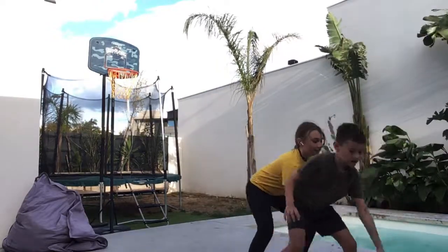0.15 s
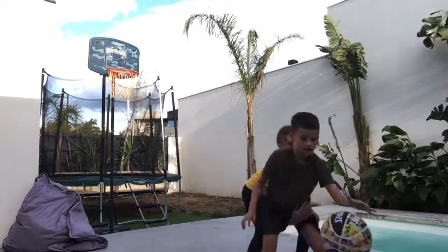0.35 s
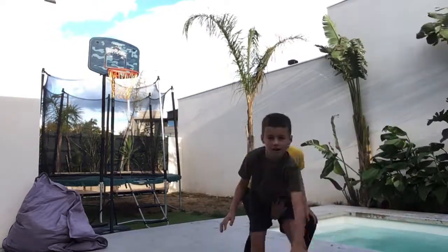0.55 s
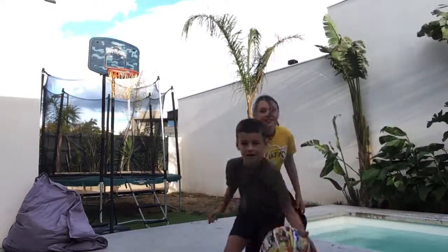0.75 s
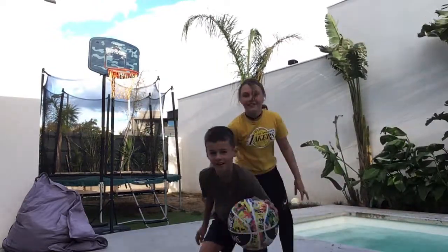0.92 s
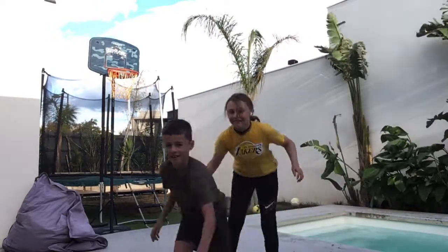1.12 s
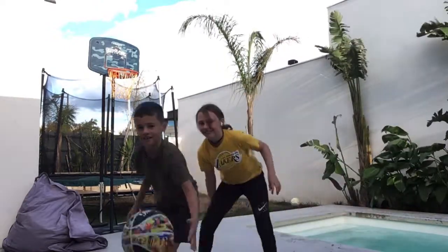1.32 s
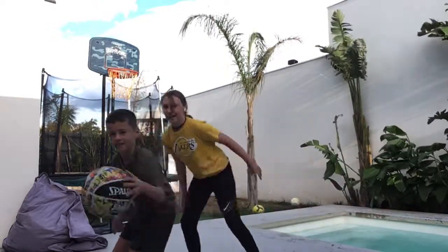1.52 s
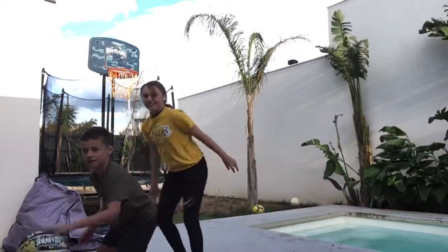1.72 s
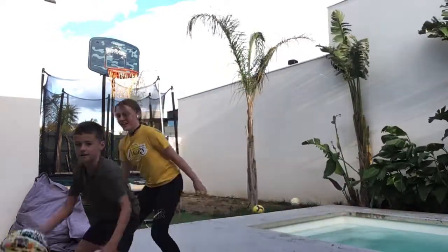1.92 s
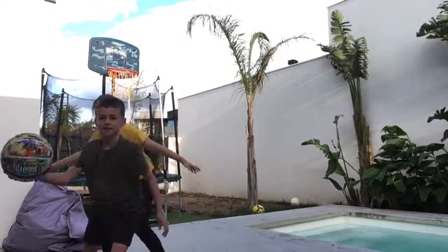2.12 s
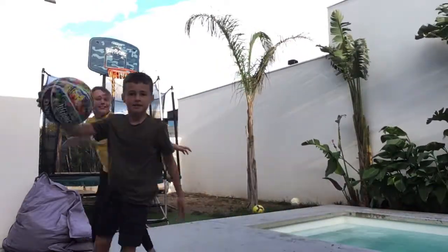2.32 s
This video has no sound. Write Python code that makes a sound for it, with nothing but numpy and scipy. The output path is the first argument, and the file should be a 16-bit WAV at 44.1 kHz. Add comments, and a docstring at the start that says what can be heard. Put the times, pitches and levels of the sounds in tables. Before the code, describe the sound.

A basketball hits concrete four times, each a sharp slap with a hollow ring and low thump, echoing off close walls; soft palm pats and faint shoe scuffs between, a few metres from the microphone.

```python
"""A basketball is dribbled on a concrete patio in a walled yard, a few metres from the microphone. The suburb
hums as filtered noise while the tail of a bounce just past dies away. Shoes tick and brush as gritty noise and
thud as damped swings. Each of four bounces is a bright noise slap with ringing ball modes and a low thump; near
walls send back separate echoes, then a diffuse noise tail. From the second bounce on, the palm pats the ball in
between, and one more footstep lands: soft damped swings with faint tails."""
import sys
import numpy as np
from scipy import signal
from scipy.io import wavfile

SR = 44100
rng = np.random.default_rng(int(sys.argv[2]) if len(sys.argv) > 2 else 0)


def how_loud(loudness_db):
    """Turn decibels into a plain amplitude multiplier (0 dB gives 1, 20 dB gives 10)."""
    steps = np.asarray(loudness_db, float) / 20
    return 10 ** steps


def transcribe(signal):
    """Save signal, clipped to [-1, 1], as a 16-bit WAV file at the path in sys.argv[1]."""
    frames = np.atleast_2d(signal).T
    limited = np.clip(frames, -1, 1)
    pcm = np.round(limited * 32767).astype(np.int16)
    wavfile.write(sys.argv[1], SR, pcm)


N = 103635

# Ball hitting the slab. Each row: start in seconds, thump level in dB (thump() adds 6),
# thump pitch in Hz, tail level in dB. The first falls before the start, so only its tail is heard.
BOUNCES = [(-.28, -20, 170, -18), (.2055, -9.5, 165, -21), (0.654, -19.5, 160, -24.5),
           (1.1999, -14.5, 161, -23.5), (1.8615, -14, 151, -21.5)]
# Soles landing dully on the slab. Each row: start in seconds, level in dB (thump() adds 6), pitch in Hz,
# tail level at that pitch in dB.
FOOTFALLS = [(0.091, -49, 110, -57), (.39, -45, 110, -54), (.52, -53, 332, -61), (0.782, -42, 79.4, -62),
             (1.53, -47, 125, -59), (1.471, -44, 63.5, -49.5), (1.82, -57, 108, -52.5),
             (1.999, -52, 59, -50)]
# Palm patting the ball, plus one footstep at 1.61 s. Each row: start in seconds, level in dB (thump() adds 6),
# pitch in Hz, # tail level at that pitch in dB.
PATS_AND_STEP = [(0.933, -60, 244, -80), (1.465, -35.5, 307, -44.5), (1.49, -47, 480, -60), (2.216, -44, 484, -57),
                 (1.61, -49, 297, -63), (2.212, -34.5, 310, -46), (2.232, -39, 315, -63), (2.253, -37.5, 330, -69)]
SOFT_CYCLES = 15.6  # pats and footfalls: cycles to die by 60 dB
THIRD_OCTAVES = 25 * 2 ** np.arange(0, 9.5, 1 / 3)  # band centres, Hz


def at_hz(points, hz):
    """Read a table on a log-frequency axis."""
    hz_points, values = np.array(points).T
    return np.interp(np.log(hz), np.log(hz_points), values)


def band_levels(spectrum):
    """Turn dB per Hz into third-octave levels whose powers sum to 0 dB."""
    level = at_hz(spectrum, THIRD_OCTAVES) + 10 * np.log10(THIRD_OCTAVES)
    return level - 10 * np.log10(np.sum(10 ** (level / 10)))


def band(x, hz, octaves):
    """Band-pass around a centre."""
    edges = np.clip([hz * 2 ** (-octaves / 2), hz * 2 ** (octaves / 2)], 12, .45 * SR)
    return signal.sosfilt(signal.butter(2, edges, "band", fs=SR, output="sos"), x)


def third_octave_noise():
    """Yield steady noise of rms 1 for each band; neighbouring bands draw on independent noise."""
    white = rng.standard_normal((2, N + SR // 2))
    for k, hz in enumerate(THIRD_OCTAVES):
        noise = band(white[k % 2], hz, 1 / 3)[SR // 2:]  # skip the filter's settling
        yield noise / noise.std()


def drift(rate):
    """Smoothed random wander of spread 1, slower for a lower rate in Hz."""
    r = np.exp(-40 * np.pi * rate / SR)  # computed on every 20th sample
    slow = signal.lfilter([1], [1, -2 * r, r * r], rng.standard_normal(N // 20 + 2002))[2000:]
    return np.interp(np.arange(N) / 20, np.arange(len(slow)), slow / slow.std())


def add(out, s, piece):
    """Mix a short piece in at a moment, leaving out any that starts before the sound does."""
    i = int(s * SR)
    if i >= 0:
        out[i:i + len(piece)] += piece[:N - i]


def suburb_hum():
    """Steady hum: third-octave noise bands, each wavering a little in level by itself."""
    # Colour of the hum. Each row: frequency in Hz, relative level in dB per Hz.
    hum_spectrum = [(15, -31), (25, -6.5), (102, 2), (317, -6.5), (516, -10), (734, -11.5), (1130, -18),
                    (2050, -21), (2220, -20.5), (6560, -31.5), (16000, -45)]
    hum_db, patchy_db = -57, 0.5
    out = np.zeros(N)
    for noise, band_db in zip(third_octave_noise(), band_levels(hum_spectrum)):
        out += noise * how_loud(hum_db + band_db + patchy_db * drift(60))
    return out


def blow_levels(hz, band_db):
    """List (start, tail level in dB) in one band: blows excite the yard around their own colours."""
    # Colour of each bounce's tail, by where the ball lands. Each row: centre in Hz, lift in dB,
    # treble change in dB, second centre in Hz, second lift in dB.
    tail_colours = [(2500, -11, -18, 1000, -6), (2580, 10.5, -22, 4000, 9), (4060, 3, -9, 1300, 1.5),
                    (5720, 12.5, -22, 1550, 4), (3500, -0.5, -10, 2500, 1.5)]
    colour_octaves, treble_from_hz, soft_octaves = 0.32, 3040, 0.68
    treble_share = hz ** 2 / (hz ** 2 + treble_from_hz ** 2)

    def lift(centre_hz, db):
        return db * np.exp(-(np.log2(hz / centre_hz) / colour_octaves) ** 2)

    blows = []
    for (s, _, _, db), colour in zip(BOUNCES, tail_colours):
        centre_hz, lift_db, treble_db, second_hz, second_db = colour
        coloured = db + band_db + treble_db * treble_share
        blows.append((s, coloured + lift(centre_hz, lift_db) + lift(second_hz, second_db)))
    for s, _, pitch_hz, db in PATS_AND_STEP + FOOTFALLS:
        blows.append((s, db - 10 * (np.log2(hz / pitch_hz) / soft_octaves) ** 2))
    return blows


def yard_tail():
    """Diffuse reverberation: every blow feeds noise bands that die at the yard's rate for their pitch."""
    # Colour of the bounce tails. Each row: frequency in Hz, relative level in dB per Hz.
    tail_spectrum = [(24, -45), (40, -19.5), (112, -4), (170, -7), (243, -4), (330, -7), (420, -23),
                     (542, -15.5), (831, -27), (1400, -28), (2570, -31.5), (2840, -32.5), (5310, -29),
                     (9000, -32.5), (11000, -41), (16000, -39)]
    # Decay of the yard. Each row: frequency in Hz, time to fall 60 dB in seconds.
    yard_t60 = [(60, 1), (160, 0.49), (420, 0.38), (1100, 0.37), (2900, 0.41), (7700, 0.27), (15000, 0.087)]
    build_s = .004
    far_db, far_stretch = -19.5, 3.45  # a weaker, longer tail from beyond the yard
    out = np.zeros(N)
    coarse = np.arange(0, N, 16)  # envelopes are computed on every 16th sample
    for hz, noise, band_db in zip(THIRD_OCTAVES, third_octave_noise(), band_levels(tail_spectrum)):
        t60 = at_hz(yard_t60, hz)
        power = np.zeros(len(coarse))
        for s, db in blow_levels(hz, band_db):
            t = np.maximum(coarse / SR - s, 0)
            near = how_loud(db - 60 * t / t60) ** 2
            far = how_loud(db + far_db - 60 * t / (t60 * far_stretch)) ** 2
            power += (near + far) * (1 - np.exp(-t / build_s)) ** 2
        out += noise * np.interp(np.arange(N), coarse, np.sqrt(power))
    return out


def shoe_brushes():
    """Soles tick and brush the concrete: band-passed grit with a quick rise and a bell-shaped fall."""
    # Each row: start in seconds, level in dB before the rise and fall, fall length in seconds, centre in Hz.
    brushes = [(0.062, -71, .02, 5960), (0.4, -67, .008, 5900), (0.459, -72, 0.058, 6100),
               (0.511, -65, 0.014, 5740), (0.895, -68.5, 0.037, 5000), (1.431, -69, 0.034, 6000),
               (1.697, -51.5, 0.0024, 4000), (1.702, -52, 0.0047, 2500), (1.71, -59, 0.018, 2290),
               (1.724, -60, 0.0044, 3880), (1.727, -66.5, .012, 3000), (1.809, -68, 0.15, 3000),
               (2.14, -65.5, 0.013, 5200)]
    out, t = np.zeros(N), np.arange(SR // 8) / SR
    for s, db, length, hz in brushes:
        grit = band(rng.standard_normal(len(t)), hz, 1.43)
        envelope = (1 - np.exp(-t / 0.0023)) * np.exp(-(t / length) ** 2)
        add(out, s, how_loud(db) * grit / grit.std() * envelope)
    return out


def thump(db, hz, cycles):
    """A squeezed body springs back: a damped swing, 60 dB down after some cycles, whose pitch sags."""
    rise_s, sag = 0.0021, 4.8  # sag: share of the pitch lost per second, at first
    t = np.arange(SR // 8) / SR
    phase = 2 * np.pi * hz * (1 - np.exp(-sag * t)) / sag
    return 2 * how_loud(db - 60 * t * hz / cycles) * (1 - np.exp(-t / rise_s)) * np.sin(phase)


def footfalls():
    """Soles land dully on the slab: one damped swing each."""
    out = np.zeros(N)
    for s, db, hz, _ in FOOTFALLS:
        add(out, s, thump(db, hz, SOFT_CYCLES))
    return out


def peak_one(x):
    """Scale to a peak of 1."""
    return x / np.abs(x).max()


def ring(hz, t60, db):
    """A struck mode dying away."""
    t = np.arange(SR // 10) / SR
    return how_loud(db - 60 * t / t60) * np.sin(2 * np.pi * hz * t)


def ball_ring(db, centre_hz):
    """The air inside the ball rings; modes far from the slap's centre are struck less."""
    # Each row: mode frequency in Hz, relative level in dB, time to fall 60 dB in seconds.
    air_modes = [(595, 10, 0.047), (1016, 7, 0.054), (1444, 3, 0.048), (1617, -2, 0.05), (1894, 1.5, 0.036),
                 (2225, -1.5, 0.039), (2500, -4, 0.065), (2680, -18, 0.045), (3150, -13, 0.054),
                 (3530, -7, 0.038), (4030, -7, 0.023), (5600, -9, .03), (6100, -16, .03)]
    ring_db, fall_db_per_oct2, scatter_db = -16, 5, 4
    total = 0
    for hz, mode_db, t60 in air_modes:
        off_centre_db = fall_db_per_oct2 * np.log2(hz / centre_hz) ** 2
        chance_db = scatter_db * rng.standard_normal()
        total = total + ring(hz, t60, db + ring_db + mode_db - off_centre_db + chance_db)
    return total


def slaps():
    """Skin slaps concrete: a click leads a noise burst; echoes come softer-edged, longer and duller."""
    # The slap, direct and from each near wall. Each row: start in seconds, peak of the main band in dB,
    # its centre in Hz, sizzle peak against it in dB, sizzle centre in Hz.
    slap_rows = [(.2047, -19, 2500, -3, 4200), (.2096, -26, 2400, -5, 9300), (.6547, -25, 2500, 0, 4900),
                 (.6602, -24, 2600, 0, 6000), (1.1999, -27, 1700, -6, 6200), (1.2059, -26, 1900, -4, 6200),
                 (1.8609, -30, 3200, -5, 6000), (1.8675, -29, 2200, -4, 5000), (1.877, -29, 2300, 2, 4400),
                 (.2215, -29, 2300, -10, 4300), (.2358, -27, 3700, -18, 6000), (.262, -36, 2600, -20, 5000),
                 (.6775, -33, 2300, -14, 5000), (.6855, -30, 3800, -5, 6500), (.694, -38, 2500, -4, 5000),
                 (1.218, -36, 4200, -8, 6000), (1.2215, -33, 1800, -16, 5000), (1.230, -37, 3900, -6, 5500),
                 (1.2335, -39, 5400, -12, 13000), (1.240, -39, 6000, -6, 8500),
                 (1.872, -42, 4000, -6, 13000), (1.8835, -31, 2500, -5, 5000),
                 (1.894, -35, 4200, -10, 7000), (1.9105, -37, 3000, -10, 5000)]
    t60_s, click_db = .004, 17
    smear, smear_rise = .25, .03  # extra decay and rise, seconds per second of delay
    clean_echo_s = .017  # echoes off the nearest walls keep their sharp edge
    knock_db, knock_hz, knock_octaves = -11, 854, 1.37  # the skin knocks below the slap
    air_db, air_hz = -19, 14500  # a crack at the very top
    loss_db_per_s = 300  # later echoes lose knock and air
    out, t = np.zeros(N), np.arange(SR // 40) / SR
    for s, db, hz, sizzle_db, sizzle_hz in slap_rows:
        # time since the latest bounce, whose thump may start just after its slap
        delay = min(s - row[0] for row in BOUNCES if row[0] < s + .003)
        loss_db = loss_db_per_s * abs(delay)
        decay_s = t60_s + smear * max(delay - clean_echo_s / 2, 0)
        rise_s = smear_rise * max(delay - clean_echo_s, 0) + 1 / SR
        noise_and_click = rng.standard_normal(len(t)) + how_loud(click_db) * (t == 0)
        burst = noise_and_click * how_loud(-60 * t / decay_s) * np.minimum((t + 1 / SR) / rise_s, 1)
        body = peak_one(band(burst, hz, .8))
        sizzle = how_loud(sizzle_db) * peak_one(band(burst, sizzle_hz, 1.0))
        knock = how_loud(knock_db - loss_db) * peak_one(band(burst, knock_hz, knock_octaves))
        air = how_loud(air_db - loss_db) * peak_one(band(burst * how_loud(-60 * t / t60_s), air_hz, 0.65))
        add(out, s, how_loud(db) * (body - sizzle - knock + air))
        add(out, s, ball_ring(db, hz))
    return out


def thumps():
    """The ball breathes once or twice at each bounce, and walls return the thump; low ones last longer."""
    # Wall echoes of the thump. Each row: start in seconds, level in dB (thump() adds 6), pitch in Hz.
    echo_rows = [(.2102, -6, 210), (.2215, -13.5, 193), (.229, -25, 253), (.236, -12.5, 210),
                 (.249, -21, 202), (.276, -14.5, 237), (.6605, -15, 137), (.674, -10, 275),
                 (.686, -15, 237), (.71, -24.5, 177), (1.206, -13, 127), (1.219, -19, 187),
                 (1.239, -12, 206), (1.256, -18, 210), (1.33, -31, 123), (1.8675, -12, 131),
                 (1.889, -15, 162), (1.906, -17.5, 176), (1.925, -17.5, 131), (1.943, -20.5, 137),
                 (1.881, -16, 340), (1.962, -24, 270), (1.978, -28, 118), (1.995, -33, 118),
                 (.6825, -21, 330), (.7, -22, 330), (1.268, -24, 250), (2.08, -30.5, 118),
                 (2.102, -33, 125), (.737, -28.5, 109), (1.283, -27, 130), (1.375, -30.5, 111)]
    cycles, at_pitch_hz, period_power = 4.88, 182, 0.81  # cycles grow as this power of the period
    out = np.zeros(N)
    for s, db, hz in [row[:3] for row in BOUNCES] + list(echo_rows):
        add(out, s, thump(db, hz, cycles * (at_pitch_hz / hz) ** period_power))
    return out


def pats_and_step():
    """The palm pats the ball between bounces, and one more footstep lands at 1.61 s: one damped swing each."""
    out = np.zeros(N)
    for s, db, hz, _ in PATS_AND_STEP:
        add(out, s, thump(db, hz, SOFT_CYCLES))
    return out


def scene():
    """Everything reaches one microphone."""
    surroundings = suburb_hum() + yard_tail()
    feet = shoe_brushes() + footfalls()
    ball = slaps() + thumps() + pats_and_step()
    return (surroundings + feet + ball)[None]


def low_pass(x):
    """Removes everything above the highest recorded frequency."""
    return signal.sosfilt(signal.butter(12, 16520, fs=SR, output="sos"), x)


def record(dry):
    """The microphone drops the deep bass, then the extreme top is cut."""
    low_cut = signal.butter(4, 55.2, "high", fs=SR, output="sos")  # Hz
    top_cut = signal.cheby2(12, 70, 17200, fs=SR, output="sos")  # 70 dB down from 17200 Hz up
    thin = signal.sosfilt(low_cut, dry)
    mix = signal.sosfilt(top_cut, thin)
    return low_pass(mix)


dry = scene()
out = record(dry)
transcribe(out)
```